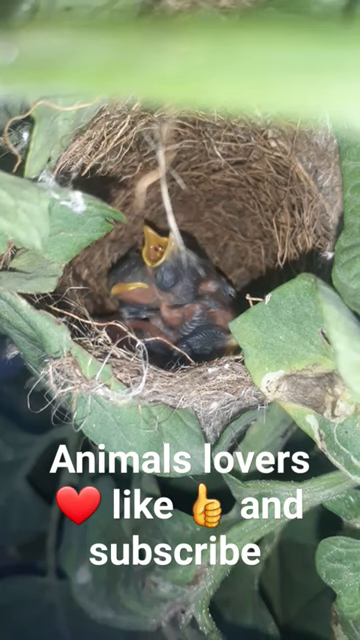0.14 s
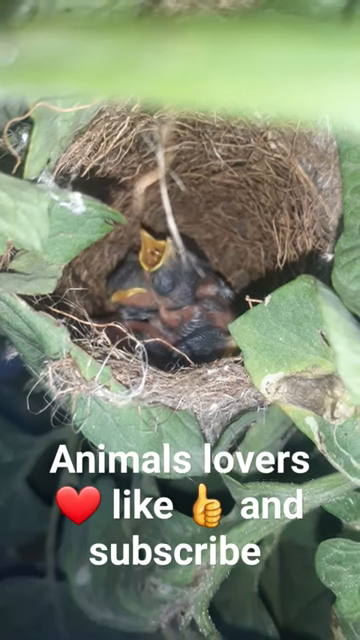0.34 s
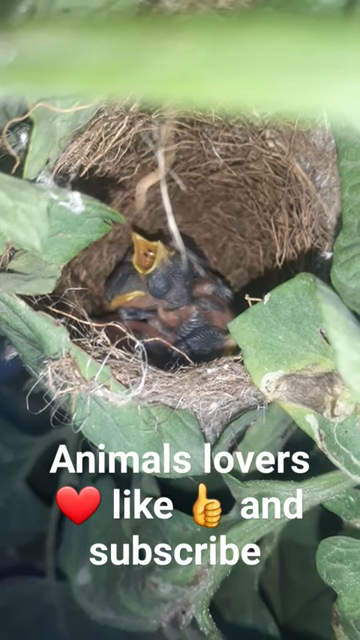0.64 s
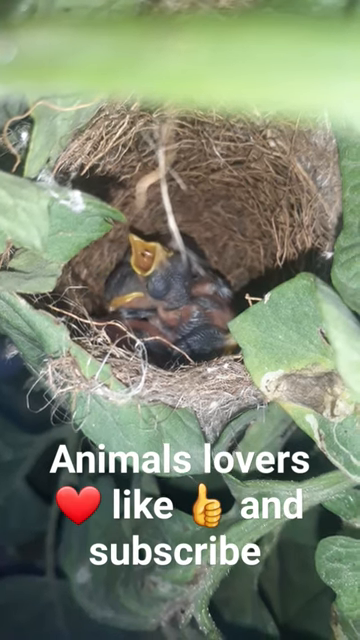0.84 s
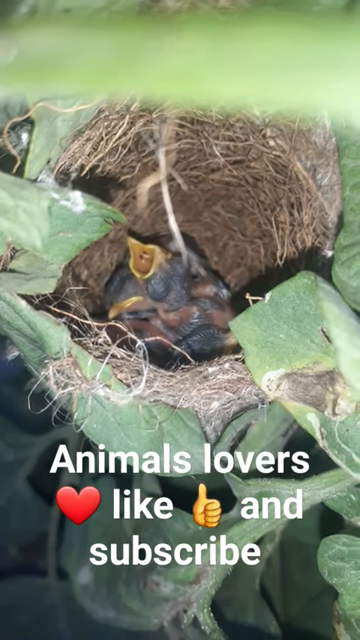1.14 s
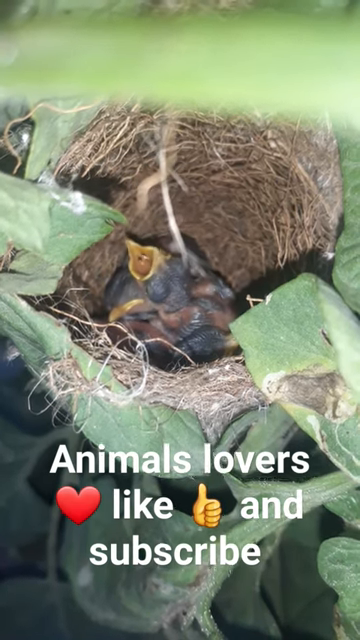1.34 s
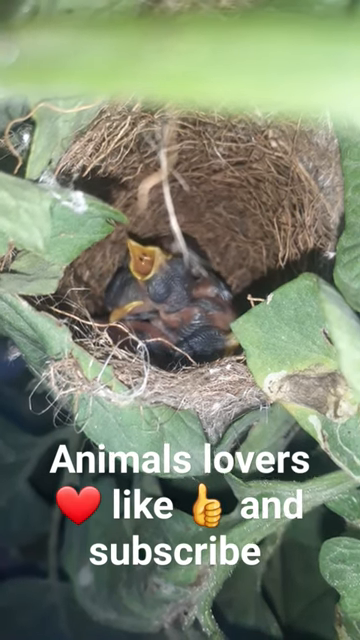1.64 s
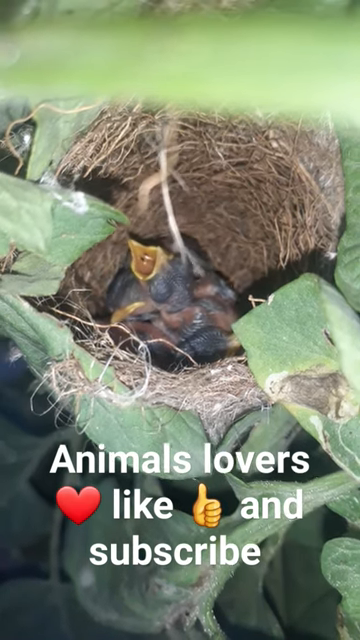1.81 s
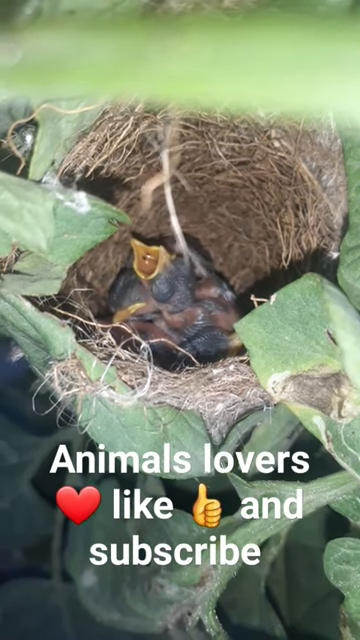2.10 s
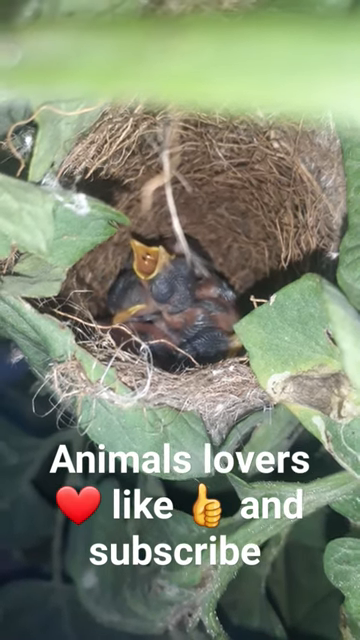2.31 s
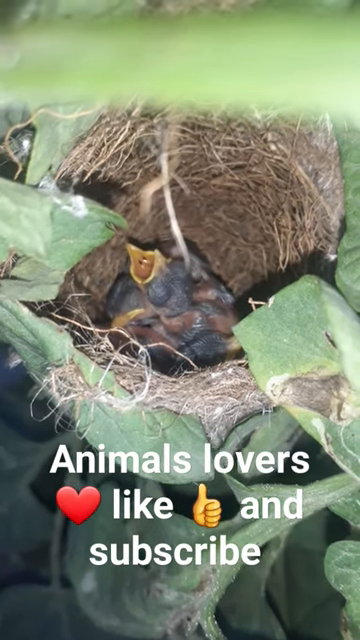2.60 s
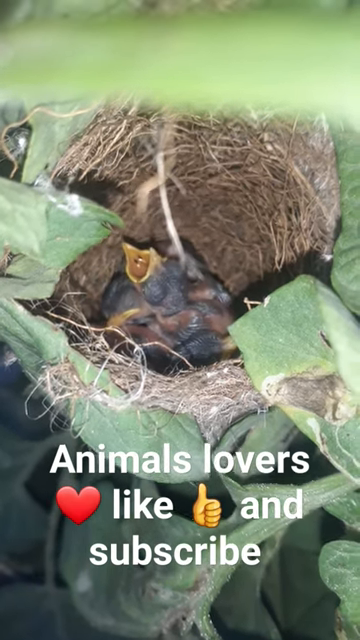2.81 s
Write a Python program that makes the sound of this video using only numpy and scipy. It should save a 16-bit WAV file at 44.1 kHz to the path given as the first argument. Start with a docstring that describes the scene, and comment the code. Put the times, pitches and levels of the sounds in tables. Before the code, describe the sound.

Nestlings chirp rapidly outdoors: faint peeps and buzzes first, then a falling warble, dry clicks and loud slurs, scratchy squeaks, repeated thin whistles, and finally swooping calls and quick chips, over quiet air.

```python
"""Birds chirp quickly among leaves, over quiet outdoor air and with a soft echo.
First come faint far whistles, buzzes, peeps and low chirps with one rising slur, then a falling warble,
dry clicks and two loud slurs. Scratchy zips and squeaks lead to thin whistles, most led by a click, as a
farther bird joins in. Two swooping calls and three quick chips end it.
The birds are wavering tones with moving pitch; the clicks and the air are filtered noise."""
import sys
import numpy as np
from scipy import signal
from scipy.fft import rfft, irfft
from scipy.io import wavfile
from scipy.ndimage import uniform_filter1d

SR = 44100
rng = np.random.default_rng(int(sys.argv[2]) if len(sys.argv) > 2 else 0)


def store_pcm(level_fs):
    """Save levels as 16-bit WAV."""
    pcm = np.round(np.clip(level_fs, -1, 1) * 32767).astype(np.int16)
    wavfile.write(sys.argv[1], SR, np.atleast_2d(pcm).T)


N = 130095  # length in samples

# Colour of the outdoor air. Each row: pitch in Hz, relative level in dB.
AIR_COLOUR = [(40, -49), (100, -36.5), (310, -18), (950, -9), (2100, -14), (3650, -1), (5000, -13),
              (7200, -26.5), (10100, -32), (15000, -64)]
# Colour of the click noise. Each row: pitch in Hz, relative level in dB.
CLICK_COLOUR = [(300, -54), (1400, -27.5), (2400, -6), (3700, -2.5), (6200, -3.5), (9500, -26.5),
                (14000, -39.5)]
# Colour added by the microphone. Each row: pitch in Hz, gain in dB.
MIC_COLOUR = [(7500, 0.5), (10500, 4), (14000, 15.5), (15500, 3.5)]

# Far, falling peeps. Each row: start in seconds, peak level in dB, first pitch in Hz.
PEEPS = [(.318, -43, 6800), (.392, -48, 3100), (.462, -45, 4200), (.497, -50, 6400), (.596, -53, 7800),
         (1.538, -43, 4000), (1.575, -52, 2450), (1.797, -45, 4100), (1.818, -48, 2600), (1.946, -50, 2600),
         (2.627, -48, 6900), (2.659, -45, 7400), (2.675, -36, 3700)]
# Far whistles that sink or rise to a held note.
# Each row: start in seconds, length in seconds, level in dB, first pitch in Hz, held pitch in Hz.
FAR_WHISTLES = [(.034, 0.049, -56, 6907, 5460), (.085, 0.085, -59.5, 5110, 5020),
                (.62, 0.058, -48.5, 3128, 3067), (.68, 0.069, -53, 2950, 2470),
                (1.835, 0.1, -35, 4320, 3796), (1.969, 0.05, -34.5, 3597, 3340),
                (2.066, 0.06, -38, 3336, 3217), (2.195, 0.048, -40.5, 3095, 2660),
                (2.232, 0.15, -37, 2616, 3270), (2.4, 0.068, -36, 3760, 3577),
                (2.46, 0.048, -32.5, 4250, 4263), (2.6, 0.0943, -37.5, 4240, 3526),
                (2.887, 0.051, -44.5, 2184, 2190)]
# Dry clicks. Each row: start in seconds, level in dB before the fades, decay time in seconds.
CLICKS = [(0.82, -19, 0.0012), (0.8268, -20, .0013), (0.8503, -16.5, 0.00097), (0.856, -18, 0.0013),
          (1.4662, -20.5, 0.0033), (1.657, -20.5, 0.00306), (1.8632, -22.5, 0.004), (2.0655, -24.5, 0.0037),
          (2.286, -25.5, 0.0043)]
# Very fast downward sweeps. Each row: start in seconds, level of the tone in dB.
ZIPS = [(1.061, -27), (1.163, -29), (1.27, -26)]
# Faint low chirps. Each row: start of the lower voice in seconds, peak level in dB, its first pitch in Hz.
LOW_CHIRPS = [(.484, -43.5, 1320), (.579, -43, 1200)]
# Trills of falling pulses. Each row: start in seconds, length in seconds, peak level in dB,
# first middle pitch in Hz, last middle pitch in Hz, swing to each side in Hz, pulses per second.
BUZZES = [(0.154, 0.066, -32, 2850, 2750, 850, 47), (0.193, 0.1, -32.5, 3280, 3560, 200, 78)]
# Near whistles that sink onto a held note.
# Each row: start in seconds, length in seconds, level in dB, first pitch in Hz, held pitch in Hz.
WHISTLES = [(1.301, 0.092, -22.5, 5920, 4700), (1.495, 0.0975, -21.5, 5150, 4600),
            (1.69, 0.11, -20.5, 5058, 4726), (1.887, 0.11, -21, 5117, 4662),
            (2.09, 0.11, -21.5, 5040, 4605), (2.308, 0.11, -23, 5010, 4590)]

# Curves of single chirps, smoothed later. Each row: time in seconds, pitch in Hz, level in dB.
RISING_SLUR = [(.319, 2500, -38.5), (.328, 4020, -36.5), (.35, 4274, -27.5), (.364, 4550, -26.5),
               (.381, 4890, -31)]
WARBLE = [(.665, 6100, -49), (.684, 5650, -37), (.692, 5004, -22.5), (.713, 4445, -23.5), (.735, 3915, -18),
          (.755, 3684, -19.5), (.769, 3735, -20.5)]
FALLING_SLUR = [(0.916, 3345, -40), (.926, 3138, -14.5), (0.932, 2978, -10.5), (0.939, 2446, -16),
                (.949, 1828, -32)]
LIFTING_SLUR = [(0.96, 1406, -31), (0.969, 1775, -25.5), (.979, 2224, -16), (0.99, 2437, -11),
                (0.999, 2520, -23), (1.011, 2460, -35.5)]
SLURS = [RISING_SLUR, FALLING_SLUR, LIFTING_SLUR]
# Shapes of repeated calls, before each call's own pitch ratio and gain.
# Each row: seconds from the start, pitch in Hz, level in dB.
SWOOP_SHAPE = [(0, 2246, -25.5), (.011, 2205, -21), (.025, 1643, -29), (.033, 1796, -27.5),
               (.045, 2798, -13), (.053, 3006, -13.5), (.063, 2830, -13), (.076, 2431, -17),
               (.092, 2298, -20)]
SQUEAK_SHAPE = [(0, 10020, -25), (.008, 8790, -35), (.018, 7750, -17), (.028, 7110, -42)]
CHIP_SHAPE = [(0, 3342, -25), (.014, 3536, -15), (.023, 3930, -16.5), (.032, 3879, -35)]
# When those calls come. Each row: start in seconds, pitch ratio, gain in dB.
SWOOPS = [(2.497, 1, 1), (2.68, 0.99, 1.5)]
SQUEAKS = [(1.082, 0.98, -0.74), (1.187, 0.95, 0.53)]
CHIPS = [(2.851, 1.097, -1), (2.885, 1, 2.5), (2.923, .985, 1.5)]

# Background: levels of hiss and air, drift of the air's patches, top of the recorded band
HISS_DB, AIR_DB, AIR_PATCH_DB, CUTOFF_HZ = -71, -51, 1.5, 15800
# Echo: levels against the direct sound, and the times to die away by 60 dB
SCATTER_DB, ECHO_DB = -8.5, -12.5
FAR_SCATTER_DB, FAR_ECHO_DB = -4, -2.5
SCATTER_T60_S, ECHO_T60_S = 0.072, 0.585
# Bird voice: overtone levels, share of pitch that wavers, wavering of level, fade at each end
SECOND_DB, THIRD_DB, JITTER, SHIMMER_DB, EDGE_S = -43.5, -52, 0.0005, 0.77, 0.005
# Peeps: length (also used by the low chirps), last pitch as a share of the first, pitch roughness
PEEP_S, PEEP_FALL, PEEP_ROUGH_HZ = 0.036, 0.68, 190
# Clicks and zips; the zip noise level is set against the zip tone
CLICK_RISE_S, ZIP_NOISE_DB = 0.001, -1.5
ZIP_S, ZIP_TOP_HZ, ZIP_END_HZ = 0.013, 8980, 2633
# Low chirps: rise as a ratio, pitch ratio of the upper voice, how early that voice starts
LOW_RISE, UPPER_RATIO, UPPER_LEAD_S = 1.3, 1.3, 0.01
BUZZ_ROUGH_HZ, BUZZ_PULSE_DB = 120, 14  # pitch roughness and depth of the pulses
# Whistles: how the pitch settles, how the level swells, and how the note ends
SINK_S, SINK_POWER = 0.034, 1.8
SWELL_SHARE, SWELL_DB, FAR_SWELL_DB = 0.47, -19.5, -4.5
RELEASE_S, DROOP_HZ = 0.014, 293
# Warble: when the pitch swings, how fast and how far to each side
WARBLE_FROM_S, WARBLE_UNTIL_S, WARBLE_HZ, WARBLE_DEPTH_HZ = 0.686, 0.7545, 47.5, 263


def amp(db):
    """Turns decibels into a gain."""
    return 10 ** (np.asarray(db) / 20)


def unit(x):
    """Scales a signal to an average (rms) level of 1."""
    return x / np.sqrt(np.mean(x ** 2) + 1e-20)


def add(mix, start, sound):
    """Lays a sound into the mix at a start time in seconds."""
    part = mix[max(round(start * SR), 0):][:len(sound)]
    part += sound[:len(part)]


def smooth_twice(x, size, axis=-1):
    """Averages neighbouring values, twice over."""
    return uniform_filter1d(uniform_filter1d(x, size, axis=axis), size, axis=axis)


def waver(n, size=120):
    """Smooth random unsteadiness; a smaller size wavers faster."""
    return unit(smooth_twice(rng.standard_normal(n + 4096), size))[:n]


def colour(x, points):
    """Makes some pitches stronger than others, following (Hz, dB) points."""
    f, db = np.transpose(points)
    bins_hz = np.fft.rfftfreq(2 * N, 1 / SR)
    gain = amp(np.interp(np.log(bins_hz + 1), np.log(f + 1), db))
    return irfft(rfft(x, 2 * N) * gain)[..., :N]


def hiss():
    """Wide, bright hiss: the steps between random values, separate on left and right."""
    return amp(HISS_DB) * unit(np.diff(rng.standard_normal((2, N + 1))))


def air(side_db=-25):
    """Quiet outdoor noise that drifts in patches of time and pitch; its low part is slightly wide."""
    spectrum = signal.stft(colour(rng.standard_normal(N), AIR_COLOUR), nperseg=512)[2]
    patches = rng.standard_normal(spectrum.shape)
    patches = uniform_filter1d(patches, size=6, axis=0)  # across pitch
    patches = unit(uniform_filter1d(patches, size=14, axis=1))  # across time
    wash = unit(signal.istft(spectrum * amp(AIR_PATCH_DB * patches), nperseg=512)[1][:N])
    side = unit(colour(rng.standard_normal(N), AIR_COLOUR))
    side = amp(side_db) * uniform_filter1d(side, size=8)  # softens the treble
    return amp(AIR_DB) * np.array([wash + side, wash - side])


def outdoors(x, scatter_db, echo_db):
    """Adds quick scatter from nearby leaves and a diffuse echo, both as fading noise."""
    t = np.arange(SR) / SR
    scatter, tail = rng.standard_normal((2, SR))
    scatter = scatter * np.exp(-np.log(1000) * t / SCATTER_T60_S) * (t > .002)
    tail = tail * np.exp(-np.log(1000) * t / ECHO_T60_S)
    response = amp(scatter_db) * scatter / np.linalg.norm(scatter)
    response = response + amp(echo_db) * tail / np.linalg.norm(tail)
    return x + signal.fftconvolve(x, response)[:N]


def voice(hz, db):
    """A nearly pure, slightly unsteady bird tone with faint overtones."""
    n = len(hz)
    phase = 2 * np.pi * np.cumsum(hz * (1 + JITTER * waver(n))) / SR
    tone = np.sin(phase)
    for k, overtone_db in enumerate([SECOND_DB, THIRD_DB], 2):
        can_be_held = k * hz < SR / 2  # leaves out overtones too high for the sample rate
        tone = tone + amp(overtone_db) * np.sin(k * phase) * can_be_held
    samples_to_end = np.minimum(np.arange(n), np.arange(n)[::-1])
    edge = np.minimum(samples_to_end / (EDGE_S * SR), 1)
    fade = np.sin(edge * np.pi / 2) ** 2
    return np.sqrt(2) * tone * amp(db + SHIMMER_DB * waver(n)) * fade


def peeps():
    """Short, hoarse far peeps: the pitch falls while it shakes quickly."""
    out, n = np.zeros(N), round(PEEP_S * SR)
    for start, db, first_hz in PEEPS:
        hz = first_hz * np.geomspace(1, PEEP_FALL, n) + PEEP_ROUGH_HZ * waver(n, size=40)
        add(out, start, voice(hz, db) * np.hanning(n))
    return out


def puffs(rows):
    """Dry clicks: each is a short puff of bright noise that dies away at once."""
    level = np.zeros(N)
    t = np.arange(SR // 20) / SR
    for start, db, decay_s in rows:
        rise = np.minimum(t / CLICK_RISE_S, 1)
        add(level, start, amp(db) * rise * np.exp(-t / decay_s))
    return level * unit(colour(rng.standard_normal(N), CLICK_COLOUR))


def zips():
    """Steep downward sweeps with a puff of noise, so short that they sound like ticks."""
    out = puffs([(start + ZIP_S / 4, db + ZIP_NOISE_DB, ZIP_S / 2) for start, db in ZIPS])
    hz = np.geomspace(ZIP_TOP_HZ, ZIP_END_HZ, round(ZIP_S * SR))
    for start, db in ZIPS:
        add(out, start, voice(hz, db))
    return out


def low_chirps():
    """Two voices rise in pitch together, the upper one slightly ahead."""
    out, n = np.zeros(N), round(PEEP_S * SR)
    for start, db, first_hz in LOW_CHIRPS:
        hz = first_hz * np.geomspace(1, LOW_RISE, n)
        add(out, start, voice(hz, db) * np.hanning(n))
        add(out, start - UPPER_LEAD_S, voice(hz * UPPER_RATIO, db) * np.hanning(n))
    return out


def trills():
    """Rough buzzes: every pulse slides down in pitch as it swells and ebbs."""
    out = np.zeros(N)
    for start, length, db, first_hz, last_hz, depth_hz, rate in BUZZES:
        n = round(length * SR)
        cycle = rate * np.arange(n) / SR % 1  # 0 to 1 through each pulse
        hz = np.linspace(first_hz, last_hz, n) + depth_hz * (1 - 2 * cycle)
        hz = hz + BUZZ_ROUGH_HZ * waver(n, size=40)
        dip_db = BUZZ_PULSE_DB * np.cos(np.pi * cycle ** 2) ** 2
        add(out, start, voice(hz, db - dip_db))
    return out


def whistles(rows, swell_db):
    """Each whistle swells while its pitch settles, then droops as it stops."""
    out = np.zeros(N)
    for start, length, db, first_hz, held_hz in rows:
        t = np.arange(0, length, 1 / SR)
        held = np.minimum((length - t) / RELEASE_S, 1)  # 1, then down to 0 at the end
        settling = np.exp(-(t / SINK_S) ** SINK_POWER)
        hz = held_hz + (first_hz - held_hz) * settling - DROOP_HZ * (1 - held) ** 2
        swell = swell_db * np.maximum(1 - t / (length * SWELL_SHARE), 0) ** 2
        add(out, start, voice(hz, db + swell) * held)
    return out


def contour(points):
    """Gives time and smooth curves of pitch and level through the points of a call."""
    s, hz, db = np.transpose(points)
    t = np.arange(s[0], s[-1], 1 / SR)
    return t, *[uniform_filter1d(np.interp(t, s, v), size=200) for v in (hz, db)]


def chirps():
    """Tones that follow drawn pitch curves: slurs, a falling warble and repeated calls."""
    out = np.zeros(N)
    for points in SLURS:
        t, hz, db = contour(points)
        add(out, t[0], voice(hz, db))
    t, hz, db = contour(WARBLE)
    warble_time = np.clip(t, WARBLE_FROM_S, WARBLE_UNTIL_S) - WARBLE_FROM_S
    vibrato = np.sin(2 * np.pi * WARBLE_HZ * warble_time)
    add(out, t[0], voice(hz - WARBLE_DEPTH_HZ * vibrato, db))
    for shape, calls in (SWOOP_SHAPE, SWOOPS), (SQUEAK_SHAPE, SQUEAKS), (CHIP_SHAPE, CHIPS):
        t, hz, db = contour(shape)
        for start, ratio, gain_db in calls:
            add(out, start, voice(hz * ratio, db + gain_db))
    return out


def scene():
    """Near and far birds in the centre, over slightly wide air and a trace of wide hiss."""
    far = peeps() + whistles(FAR_WHISTLES, FAR_SWELL_DB)
    near = puffs(CLICKS) + zips() + low_chirps() + trills() + whistles(WHISTLES, SWELL_DB) + chirps()
    birds = outdoors(far, FAR_SCATTER_DB, FAR_ECHO_DB) + outdoors(near, SCATTER_DB, ECHO_DB)
    return hiss() + air() + birds


def record(dry):
    """The microphone lifts the treble, then a steep filter removes the very top."""
    low_pass = signal.firwin(511, CUTOFF_HZ, window=("kaiser", 9), fs=SR)
    return signal.oaconvolve(colour(dry, MIC_COLOUR), low_pass[None], "same")


dry = scene()
out = record(dry)
store_pcm(out)
```